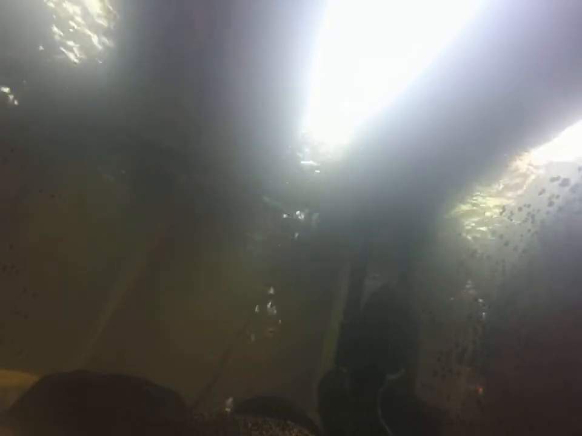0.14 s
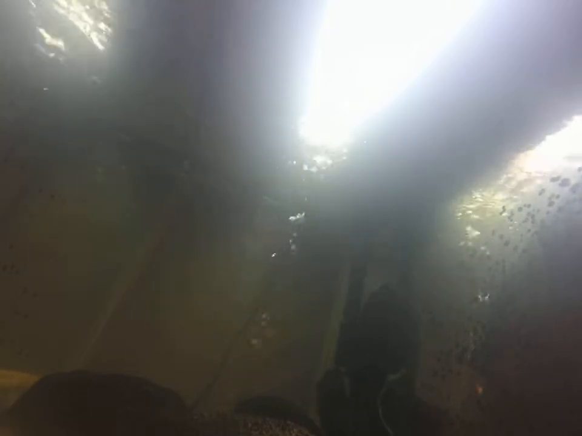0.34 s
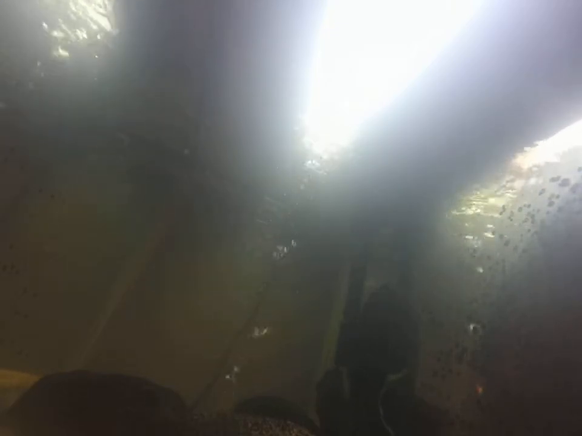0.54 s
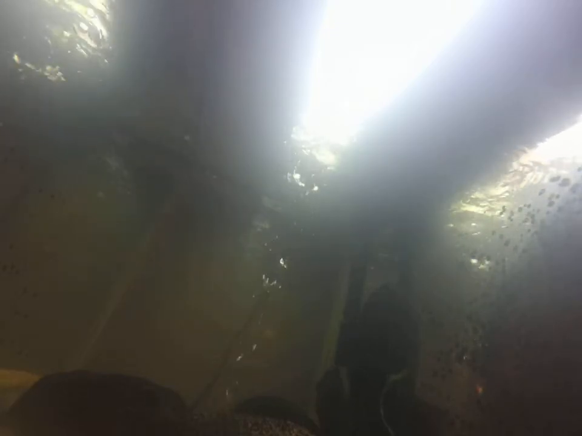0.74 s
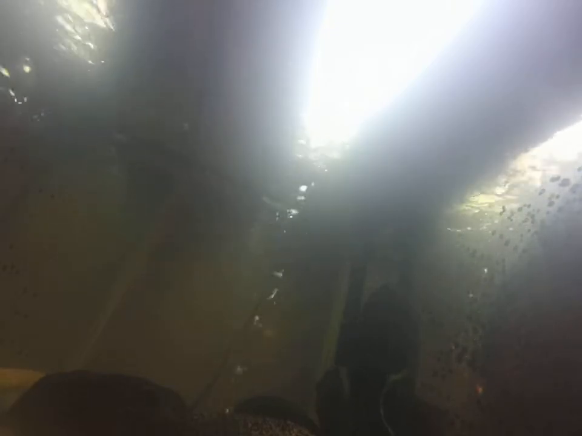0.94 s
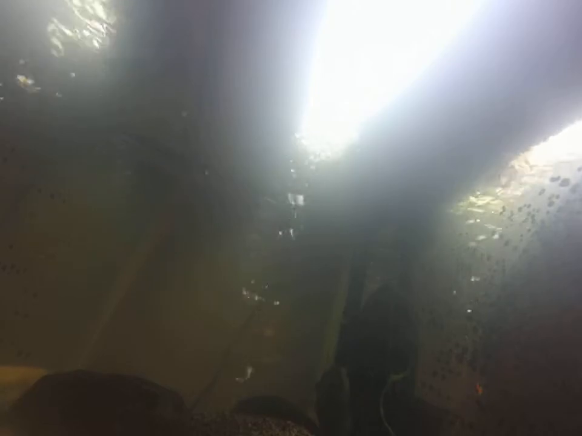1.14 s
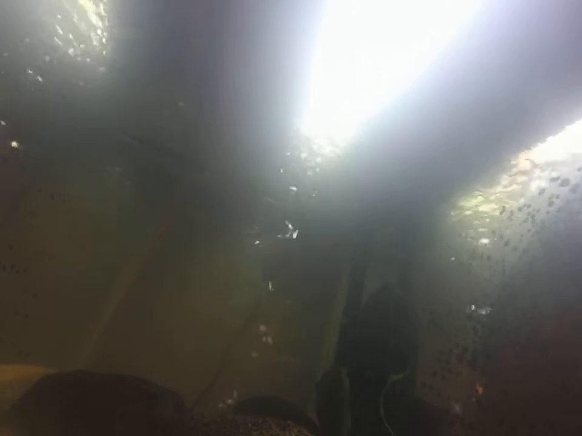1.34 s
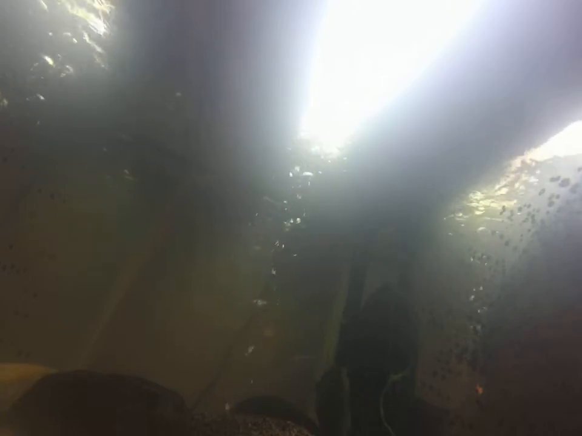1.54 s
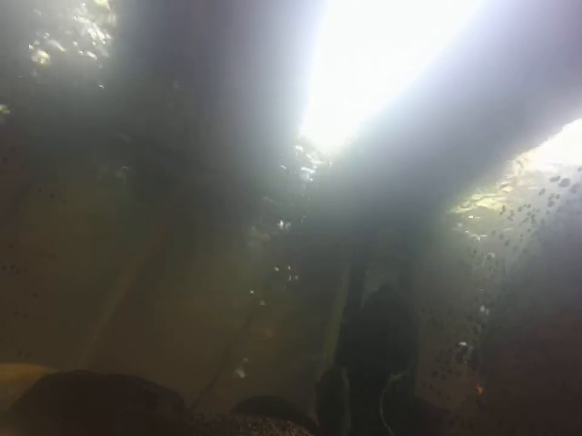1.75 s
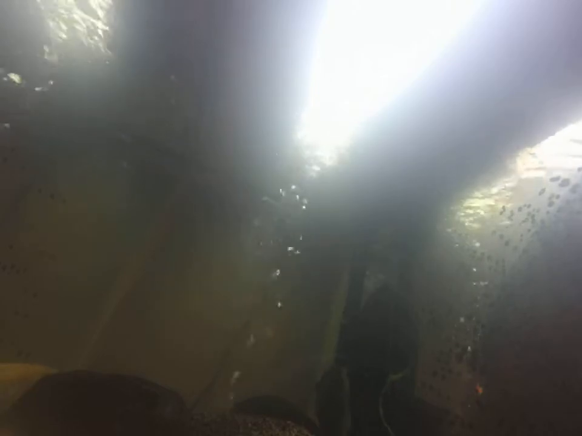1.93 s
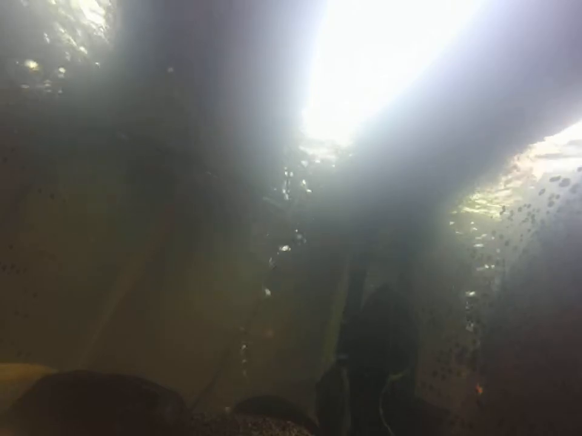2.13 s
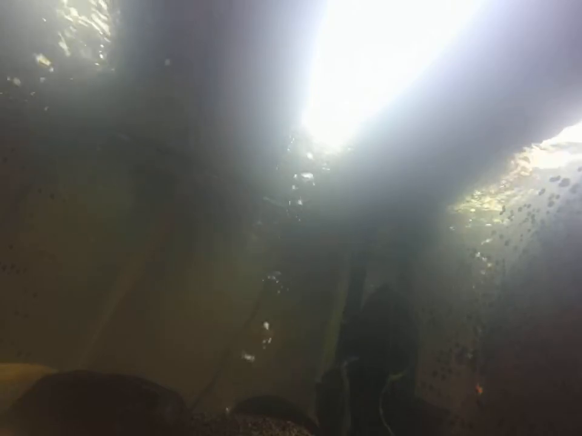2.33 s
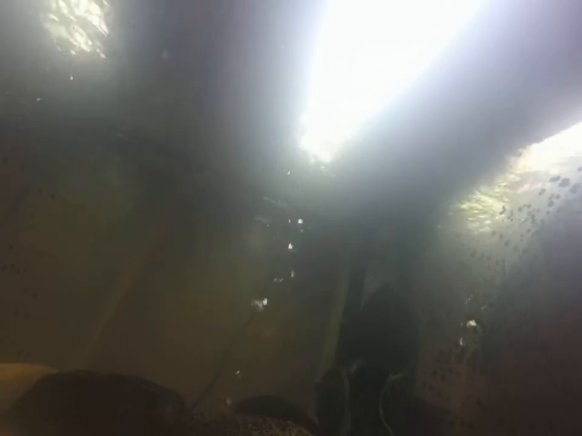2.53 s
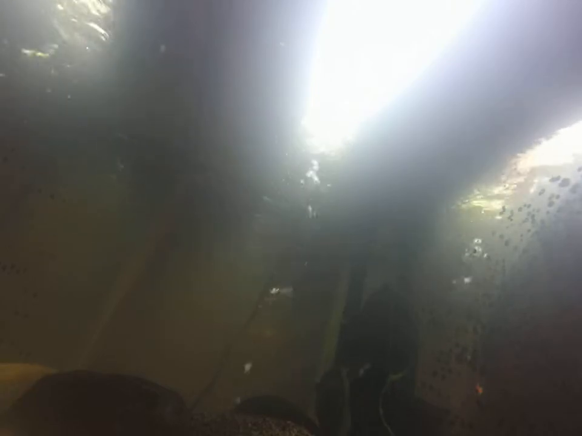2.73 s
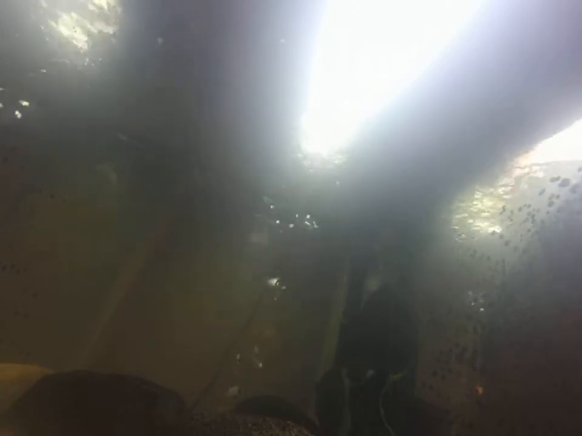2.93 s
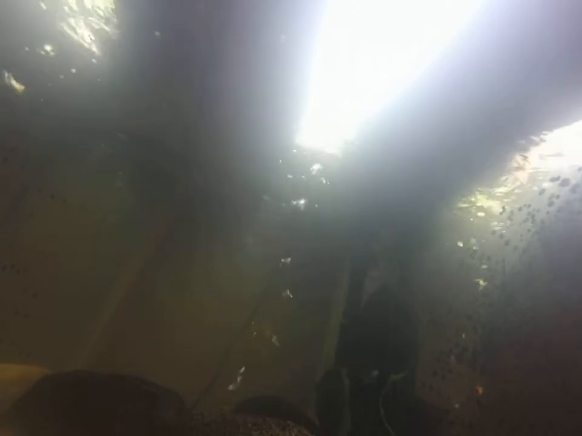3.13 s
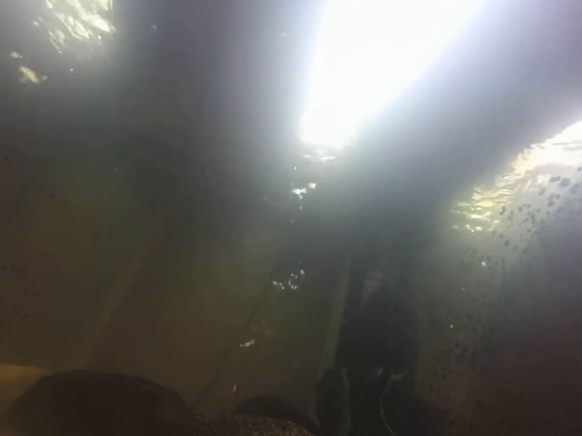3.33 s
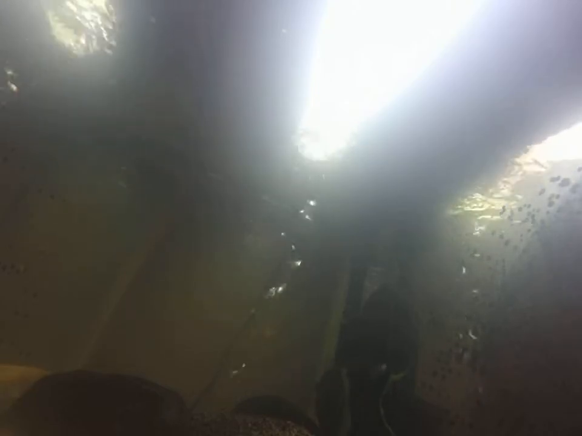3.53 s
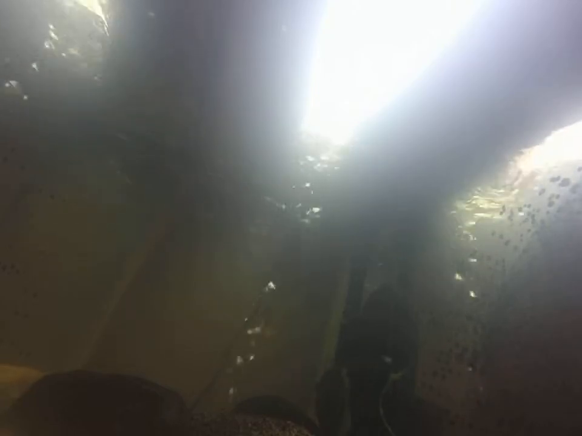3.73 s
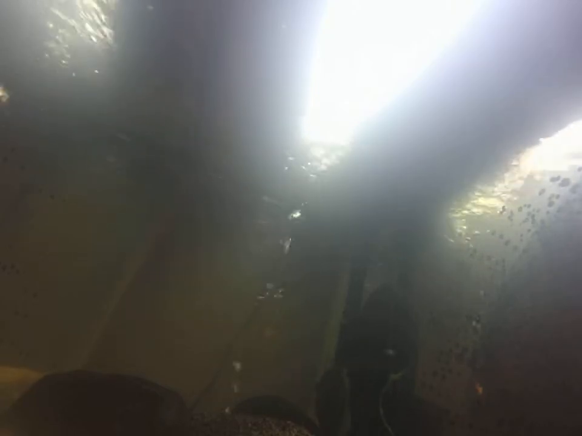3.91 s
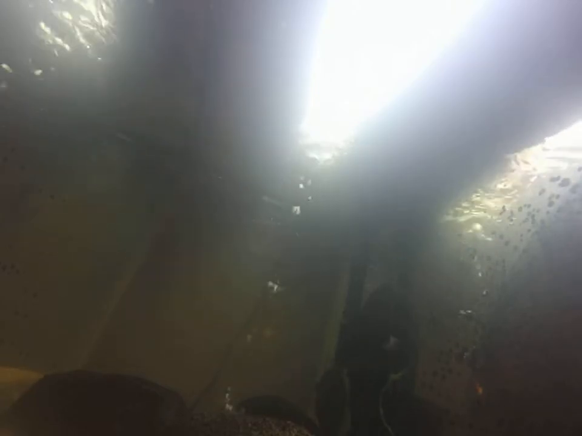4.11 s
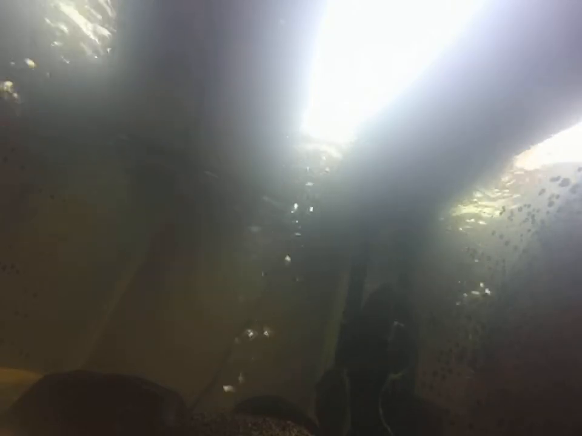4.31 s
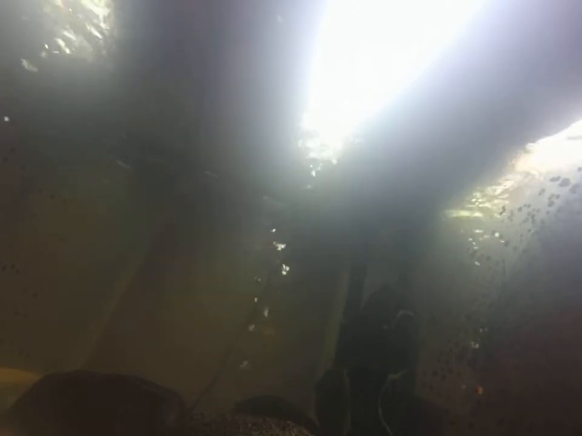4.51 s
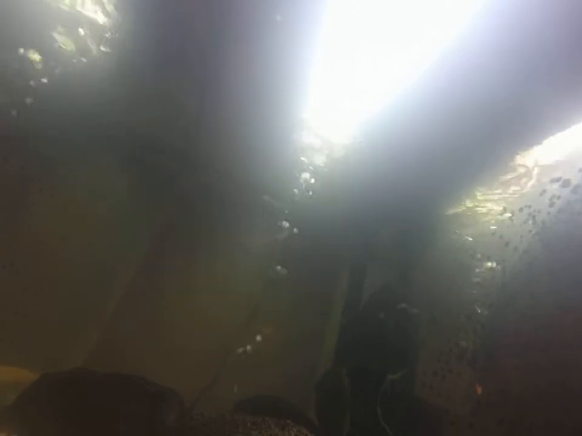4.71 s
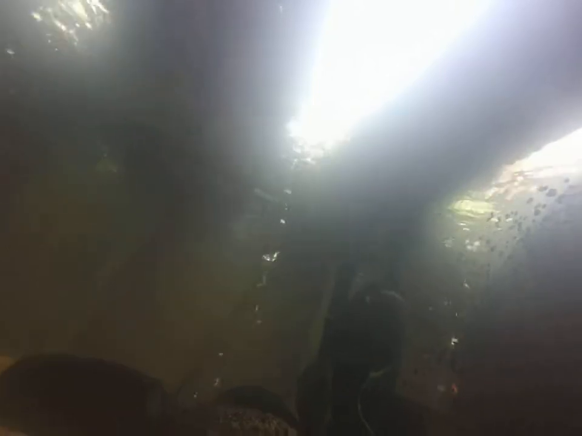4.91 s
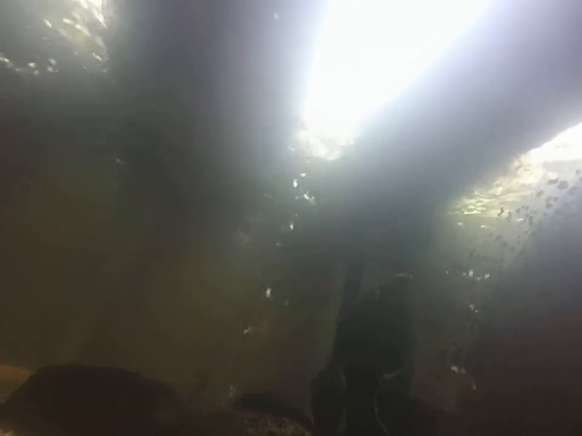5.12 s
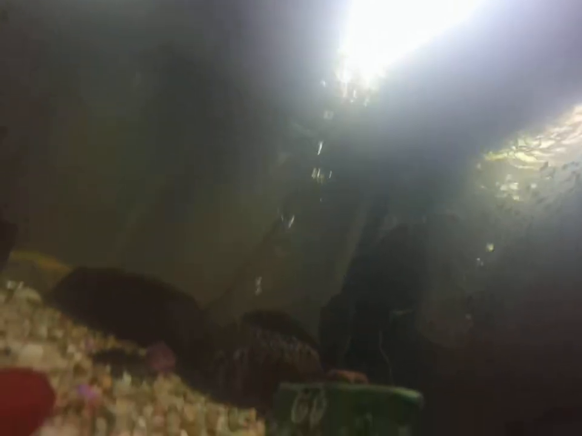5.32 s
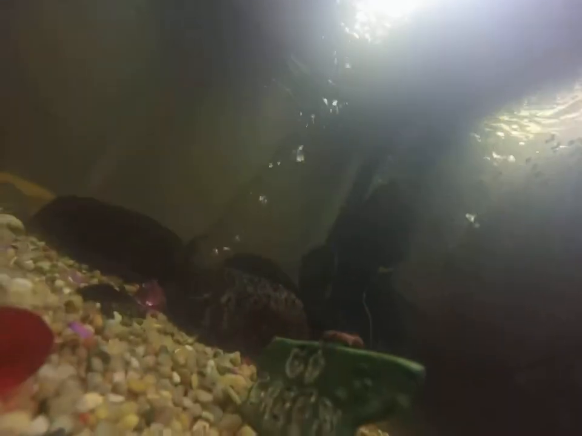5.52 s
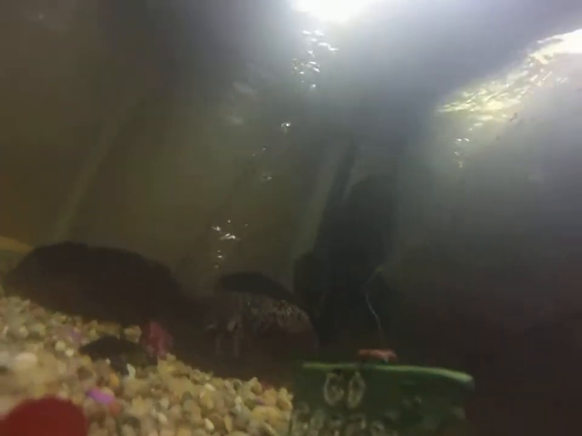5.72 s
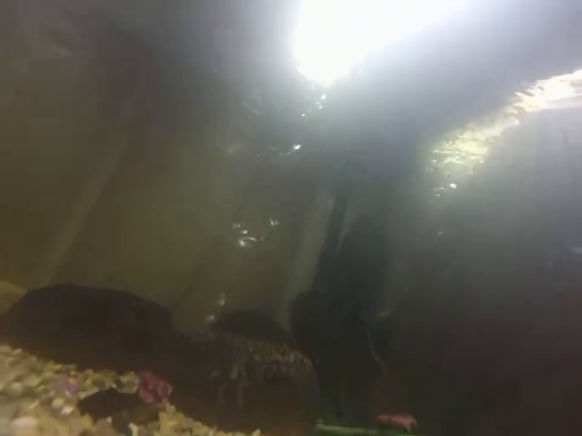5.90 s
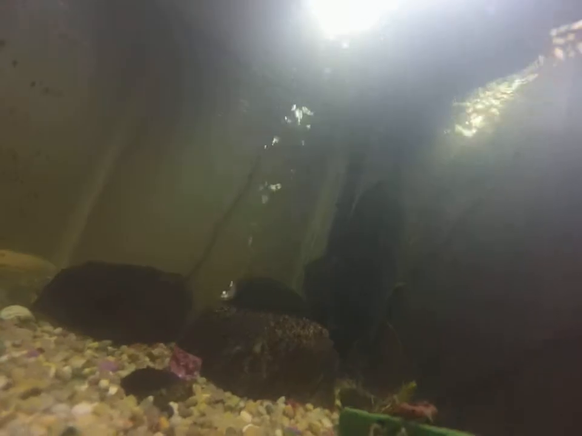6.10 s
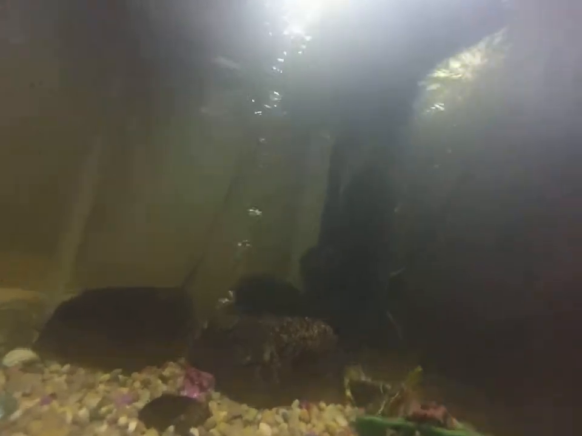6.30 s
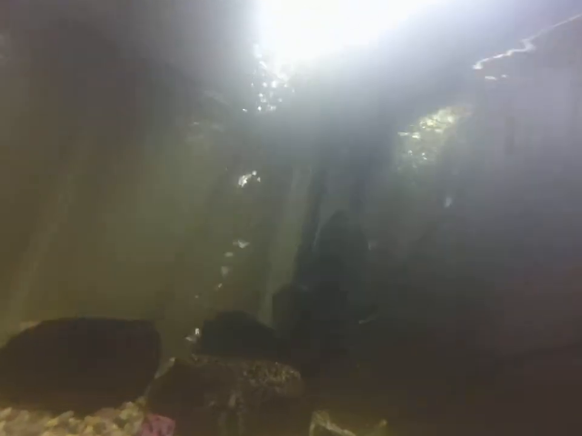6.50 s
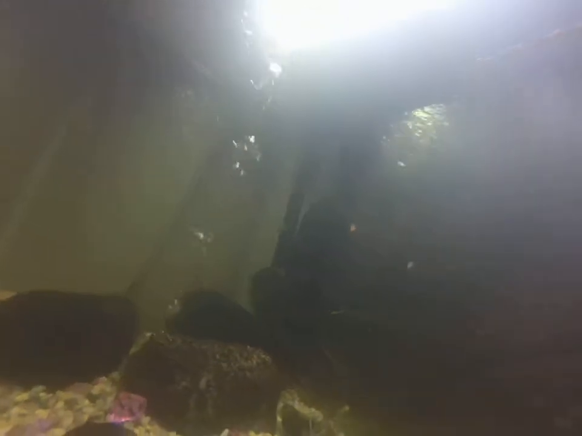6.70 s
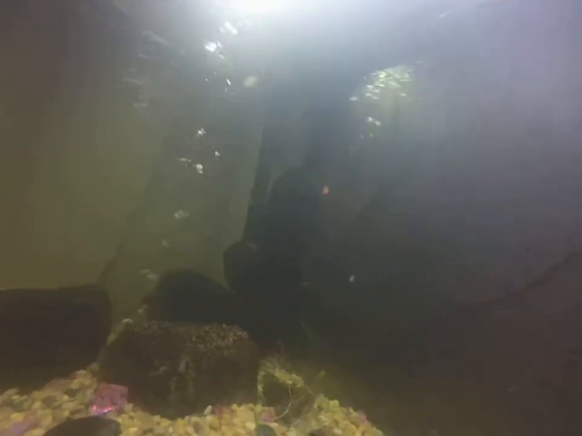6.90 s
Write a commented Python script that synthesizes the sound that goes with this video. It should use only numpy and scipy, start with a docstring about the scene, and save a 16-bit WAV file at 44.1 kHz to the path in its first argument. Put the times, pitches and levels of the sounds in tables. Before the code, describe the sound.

A close, enclosed underwater microphone picks up a droning air pump, murmuring water and crisp, glassy bubble plinks over faint hiss. Midway come dull nudges, then gritty scrapes, plastic knocks and a run of deep bouncing thumps as the housing shifts on the gravel. One more loud, clipped clatter leaves the water briefly muted before a looser, more gurgling bubble sound recovers with less deep hum.

```python
"""An air pump hums through the glass of a fish tank as a sum of mains harmonics, and the water churns as flickering
noise bands. Bubbles ping as damped sines and excite the standing waves of the water. A camera housing on the gravel
is nudged, dragged, and dropped: filtered noise scrapes, damped sines knock, single pressure swings thump and bounce.
The background level dips under the loud handling and recovers; behind it lies a fine, even background hiss, partly
the microphone's own noise, made of noise shaped by resonances."""
import sys
import numpy as np
from scipy import signal
from scipy.fft import rfft, irfft
from scipy.io import wavfile
from scipy.ndimage import uniform_filter1d

SR = 44100
rng = np.random.default_rng(int(sys.argv[2]) if len(sys.argv) > 2 else 0)


def ratio(d):
    """dB to gain"""
    e = np.asarray(d, float) / 20
    return 10 ** e


def digitize_waveform(pressure):
    """Quantize a signal to 16-bit integers and store it at the path in sys.argv[1].

    Rows of a 2-D input are taken as channels; values are limited to [-1, 1].
    """
    field = np.atleast_2d(pressure).T
    bounded = np.clip(field, -1, 1)
    quanta = np.round(bounded * 32767).astype(np.int16)
    wavfile.write(sys.argv[1], SR, quanta)


N = 306495
T = np.arange(N) / SR
SIZE = 4096  # samples of one short sound

# Harmonics 1-5 of the pump: level/dB (rms; the first is further set by the seating of the housing)
PUMP_HARMONICS = [-34.5, -37, -35.6, -52, -52]
MAINS_HZ = 59.96
SLOW_HZ, SLOW_DB = 12, -43.5  # slow throb under the hum: frequency, mean level in dB rms
# change of the lowest hum tone when seated, its further change when fully loose
SEATED_BASS_DB, LOOSE_BASS_DB = -0.94, -10
# Spectrum of the churning water: f/Hz, relative level/dB (per Hz)
CHURN_SPECTRUM = [(15, -11), (50, -7), (100, -2.5), (165, 0.5), (230, -6), (330, -14.5), (480, -22),
                  (550, -30), (680, -30), (730, -33.5), (1000, -42)]
CHURN_DB = -38.5  # rms before the level curve
LOOSE_BURBLE_DB = 16.5  # lift of the upper churn bands, relative to the rest, when fully loose
# Air modes inside the housing: f/Hz, width/Hz, level/dB
HOUSING_MODES = [(378.3, 20, 7.5), (646, 42, 7)]
# Standing waves of the water, before scaling in use: f/Hz, width/Hz, level/dB
TANK_MODES = [(2540, 53, -28), (3100, 75, -1.5), (3635, 71, -2), (4370, 110, 0), (5370, 120, -6),
              (5640, 71, -1), (6000, 46, -21.5), (6196, 120, -3.5), (6640, 29, -11), (7110, 75, -5),
              (7540, 63, -27.5), (7830, 60, -5), (8300, 75, -16.5), (8790, 150, -7.5), (10200, 61, -7),
              (11800, 48, -35.5), (11900, 170, -17), (12600, 480, -29)]
# Clear bubbles from the air outlet: t/s, peak level/dB, f/Hz, relative strength of the treble snap/dB
CLEAR_BUBBLES = [(0.0778, -42.5, 5370, 3), (0.1944, -32.5, 3180, -21), (0.2072, -30, 4800, -17),
                 (0.2973, -20.5, 6430, -15), (0.336, -34.5, 9200, -5), (0.3778, -30, 2550, -14),
                 (0.384, -38, 4480, -6), (0.4662, -31.5, 5040, -18), (0.6078, -36, 4350, 1),
                 (0.7467, -35.5, 2540, -19), (0.78, -20.5, 3770, -25), (1.0077, -34.5, 11900, -21),
                 (1.076, -34, 6000, -19), (1.1094, -39.5, 3100, 5), (1.1882, -34, 4270, 5),
                 (1.3005, -38.5, 8790, -16), (1.3775, -31, 4370, -10), (1.5095, -34, 3520, -21),
                 (1.5712, -34.5, 3100, -42), (1.6287, -38, 2930, -29), (1.7292, -32.5, 3300, -43),
                 (1.9061, -38.5, 4580, -3), (1.9988, -30, 7110, 7), (2.1021, -40, 5640, 2),
                 (2.1333, -30.5, 4370, -19), (2.1794, -36.5, 6130, -15), (2.22, -32, 7830, -10),
                 (2.2697, -27, 4700, -21), (2.4563, -35.5, 4500, -19), (2.6, -32.5, 4750, -14),
                 (2.7028, -32, 7740, -26), (2.7177, -27.5, 3790, -14), (2.8704, -36.5, 8300, -33),
                 (2.9526, -28, 4180, -13.5), (3.0006, -38.5, 2840, -37), (3.1807, -34, 10100, -13),
                 (3.201, -29.5, 9300, -13), (3.2793, -37, 3100, 1), (3.3232, -36, 5640, -15),
                 (3.4126, -23.5, 4370, -17), (3.4795, -32, 3490, -20), (3.5115, -26.5, 3930, -23),
                 (3.6805, -36.5, 7180, -5), (3.8132, -30, 10100, -15.5), (3.938, -32, 4270, -10.5),
                 (3.962, -32.5, 3430, -38), (4.0578, -31.5, 4360, -24), (4.1584, -37.5, 5740, -16),
                 (4.1722, -29, 10200, -17.5), (4.2462, -34, 4700, -28), (4.4154, -32, 8790, -11),
                 (4.7595, -11, 4900, -30), (4.8196, -21.5, 4720, -18), (4.8457, -27.5, 5300, -23),
                 (5.482, -40, 3150, -22), (5.5802, -29, 3640, -4.5), (5.66, -30, 4320, 9),
                 (5.7432, -32.5, 9700, -21), (6.0452, -48, 3620, -8), (6.1663, -50, 5320, -5),
                 (6.215, -43, 3100, -1), (6.2981, -42, 5160, -15), (6.3123, -37.5, 5540, -9),
                 (6.376, -32.5, 4440, -12), (6.4418, -45, 2700, -29), (6.4987, -36.5, 4030, -10),
                 (6.592, -44.5, 4520, -20), (6.6429, -38, 2860, -7), (6.6707, -38, 4200, -22),
                 (6.758, -35.5, 4450, 0), (6.7387, -47, 3110, -25), (6.9207, -34.5, 4340, -17),
                 (6.922, -34, 2620, -27)]
# Large dull bubbles at the surface: t/s, peak level/dB, initial f/Hz
LARGE_BUBBLES = [(0.078, -41, 560), (0.1424, -41.5, 1500), (1.304, -48, 633), (1.593, -36, 650),
                 (1.628, -41, 1770), (1.768, -43, 602), (2.02, -47, 610), (3.289, -45, 1530),
                 (3.462, -39, 581), (4.544, -45, 1420), (6.588, -41, 720), (6.621, -43, 658),
                 (6.655, -43.5, 1610), (6.805, -40, 692), (6.895, -40.5, 667)]
LESSER_DB, LESSER_SPREAD_DB = -50.5, 9.5  # softer outlet bubbles, before the level curve: faintest peak, range
BLIP_DB, BLIP_SPREAD_DB = -58, 9  # middling surface bubbles, before the level curve: faintest peak, range
# Housing dragged over gravel: start t/s, duration/s, level/dB (rms before the stroke envelope)
SCRAPE_STROKES = [(4.638, 0.074, -46.5), (4.701, 0.14, -39), (4.875, 0.062, -29.5), (4.952, 0.12, -38.5),
                  (5.063, 0.19, -35.5), (5.24, 0.064, -33.5), (5.292, 0.075, -27), (5.356, 0.18, -51),
                  (5.505, 0.12, -51), (5.811, 0.034, -27.5), (5.843, 0.063, -43), (5.913, 0.073, -45)]
SCRAPE_TOP_HZ, BRIGHTER_DB_PER_OCTAVE = 3300, 14  # top of a -40 dB scrape; pressing harder raises it
# Resonances of the scraped shell: f/Hz, width/Hz, level/dB
SHELL_MODES = [(630, 92, 3.5), (1370, 180, 0.5), (2000, 370, -1.5), (2850, 390, 6), (4700, 1600, 4)]
# Stones against the housing: t/s, peak level/dB, f/Hz, relative strength of the snap/dB
STONE_KNOCKS = [(3.683, -28.5, 583, -29), (4.174, -38, 620, -32), (4.595, -34.5, 1190, -28),
                (4.632, -35, 1380, -36), (4.713, -23, 1320, -30), (4.731, -15, 1320, -27),
                (4.807, -21.5, 2690, -19), (4.879, -22, 630, -23), (4.963, -17.5, 1340, -26),
                (5.043, -28, 694, -13), (5.239, -23, 624, -15), (5.256, -21.5, 630, -29),
                (5.278, -23, 2800, -34), (5.303, -16, 610, -34), (5.328, -13, 2920, -31),
                (5.343, -13.5, 3020, -33), (5.488, -28, 1500, -25), (5.796, -16.5, 3050, -18),
                (5.811, -6, 1380, -13), (5.82, -0.5, 2750, -16), (5.843, -11.5, 1660, -21.5),
                (5.856, -3, 1940, -21.5), (5.862, -2, 1630, -52), (5.878, -10, 2680, -21.5),
                (5.902, -23.5, 1340, -20), (5.911, -18, 2920, -28.5), (5.93, -11.5, 1470, -40.5),
                (5.951, -18.5, 1150, -45), (5.967, -33.5, 1200, -27), (6.064, -36.5, 625, -22),
                (6.075, -26, 1280, -43), (6.087, -45, 2200, -36), (6.104, -46, 1500, -20)]
# Bumps that squeeze the air at the microphone: t/s, peak level/dB, f/Hz, direction of swing (+1 or -1)
SINGLE_THUMPS = [(3.699, -19, 90, 1), (3.715, -28, 70.4, 1), (4.143, -17, 117, 1), (4.198, -22, 60.5, 1),
                 (4.731, -19, 250, 1), (4.962, -17.5, 200, 1), (5.019, -9.5, 65, 1), (5.075, -11, 130, 1),
                 (5.107, -9, 166, -1), (5.126, -10.5, 150, -1), (5.179, -6, 150, -1)]
# the dragged housing judders
JUDDER_START_S, JUDDER_GAP_S, JUDDER_DB, JUDDER_HZ = 5.043, 0.024, -13, 169
# dropped, it bounces: each bounce comes after a longer gap, weaker and lower than the last
BOUNCE_S, BOUNCE_GAP_S, GAP_GROWTH_S = 5.370, 0.0245, 0.0039
BOUNCE_DB, BOUNCE_LOSS_DB, BOUNCE_HZ, BOUNCE_SAG_HZ = -0.05, 3.1, 196.5, 9
# the shell touches a stone at each bounce
TAP_DB, TAP_LOSS_DB, TAP_HZ, TAP_LEAD_S = -20, 1.9, 713, 0.0022
TAP_SNAP_DB, TAP_DULLING_DB = -18, 3.5
# Nudges that set the water rumbling: t/s, level/dB (rms at the height of the swell)
RUMBLE_NUDGES = [(3.699, -24), (4.17, -25)]
STIR_DB_PER_S, SETTLE_DB_PER_S = 700, 152
# Rumble while the housing is dragged: t/s, level/dB (rms)
DRAG_RUMBLE = [(4.4, -50), (4.6, -38), (5.19, -23), (5.22, -30), (5.33, -34.5), (5.5, -50.5)]
# Spectrum of the background hiss before its resonances: f/Hz, relative level/dB (per Hz)
HISS_SPECTRUM = [(410, -30), (700, 1.5), (2190, -5.5), (3070, -5.5), (3920, -15.5), (4350, -11.5),
                 (8990, -20.5), (12300, -17), (15500, -18)]
HISS_DB = -63.5  # mean level before the level curve
# The background level dips under the loud handling and recovers: t/s, level/dB
BACKGROUND_LEVEL = [(0, 0), (4.6, 0), (5, 1.5), (5.46, -5.5), (5.79, -3), (5.87, -26), (5.97, -15.5),
                    (6.1, -14), (6.501, -5.5), (6.95, -3)]
# How loosely the housing sits on the gravel: t/s, share (0-1)
LOOSENESS = [(4.6, 0), (5.36, 0.88), (5.46, 0.35), (5.87, 0.4), (6.1, 0.6), (6.3, 0.2), (6.95, 0.7)]


def unit(x):
    """Normalisation to rms 1."""
    return x / np.sqrt(np.mean(x ** 2))


def walk(rate):
    """Slow random modulation: random levels, rate a second, smoothed and scaled to rms 1."""
    k = int(SR / rate)
    levels = rng.standard_normal(SIZE)[np.arange(N) // k]
    return unit(uniform_filter1d(uniform_filter1d(levels, k), k))


def band(x, lo_hz, hi_hz):
    """Butterworth band-pass filtering."""
    sos = signal.butter(2, [lo_hz, min(hi_hz, SR / 2.2)], "band", fs=SR, output="sos")
    return signal.sosfilt(sos, x)


def mix(times, peak_db, sounds):
    """Superposition: each sound is laid at its time with its peak level."""
    out = np.zeros(N + sounds.shape[1])
    for s, db, sound in zip(times, peak_db, sounds):
        start = int(s * SR)
        out[start:start + len(sound)] += ratio(db) * sound / np.abs(sound).max()
    return out[:N]


def coloured(points):
    """Random spectrum shaped by (f/Hz, level/dB) points, and its frequencies."""
    hz, db = np.transpose(points)
    f = np.fft.rfftfreq(N, 1 / SR) + 1  # the offset avoids log(0)
    gain_db = np.interp(np.log(f), np.log(hz), db, left=-90, right=-90)
    return rfft(rng.standard_normal(N)) * ratio(gain_db), f


def peaks(f, modes):
    """Resonance: gain of a direct path plus a peak at each (f/Hz, width/Hz, level/dB) mode."""
    return 1 + sum(ratio(db) / np.sqrt(1 + (2 * (f - hz) / width) ** 2) for hz, width, db in modes)


def ping(hz, cycles, rise=0., swell=0.71):
    """Damped oscillation, one a row: it swells, decays about 9 dB in so many cycles and may rise in pitch."""
    turns = np.outer(hz, np.arange(SIZE) / SR)
    wave = np.sin(2 * np.pi * turns * (1 + rise * np.minimum(turns / cycles, 2)))
    return wave * np.exp(-turns / cycles) * (1 - np.exp(-(turns / swell) ** 2))


def crack(count, decay_s, lo_hz, hi_hz):
    """Transients: short decaying bursts of band-limited noise, one a row."""
    t = np.arange(SIZE) / SR
    envelope = np.exp(-t / decay_s) * np.minimum(t / 0.00075, 1)
    return band(rng.standard_normal((count, SIZE)) * envelope, lo_hz, hi_hz)


def pump(lowest_db):
    """Harmonic series of a mains-driven diaphragm: even tones a quarter turn behind make the wave lopsided."""
    turn = 2 * np.pi * MAINS_HZ * T
    tones = []
    for k, db in enumerate(PUMP_HARMONICS):
        level = ratio(db + 0.81 * walk(1.5))
        tones.append(level * np.cos((k + 1) * turn - np.pi / 2 * (k % 2)))
    throb = ratio(SLOW_DB + 2.8 * walk(2)) * np.sin(2 * np.pi * SLOW_HZ * T + 2.0 * walk(1.5))
    return np.sqrt(2) * (ratio(lowest_db) * tones[0] + sum(tones[1:]) + throb)  # rms to peak


def churn(burble_db):
    """Turbulence: noise in half-octave bands, each flickering, the upper ones gurgling together."""
    colour, f = coloured(CHURN_SPECTRUM)
    colour = colour * peaks(f, HOUSING_MODES)
    gurgle, out = walk(17), 0
    for centre in np.arange(7, 21) / 2:  # log2 of the band centre in Hz
        share = np.clip(1 - 2 * np.abs(np.log2(f) - centre), 0, 1)
        upper = np.clip(centre - 7.6, 0, 1)
        flicker_db = 1.6 * walk(25) + upper * (2.2 * gurgle + burble_db)
        out = out + irfft(colour * share, N) * ratio(flicker_db)
    return ratio(CHURN_DB) * unit(out)


def in_tank(hz, snap_db):
    """Bubble excitation of standing waves: ping and snap, direct, through the modes and off glass and gravel."""
    mode_hz, width, db = np.transpose(TANK_MODES)
    mode_cycles = mode_hz / (np.pi * .55 * width)
    modes = ping(mode_hz, mode_cycles[:, None]) * (ratio(.45 * db) * width / SR)[:, None]
    # where the bubble is decides how it couples to each wave
    coupling = ratio(3.0 * rng.standard_normal((len(hz), len(TANK_MODES))))
    coupling = coupling * (-1) ** np.arange(len(TANK_MODES))
    scatter = crack(len(hz), 0.0094, 2000, 13000)
    snap = ratio(snap_db + 4)[:, None] * crack(len(hz), 0.0018, 4000, 12000)
    source = ping(hz, 4.2, swell=0.8) + snap
    path = ratio(25) * coupling @ rfft(modes, 2 * SIZE) + ratio(-27) * rfft(scatter, 2 * SIZE)
    return irfft(rfft(source, 2 * SIZE) * (1 + path))[:, :SIZE]


def bubbles():
    """Volume pulsation of the clear bubbles from the air outlet, ringing the tank."""
    s, db, hz, snap_db = np.transpose(CLEAR_BUBBLES)
    return mix(s, db, in_tank(hz, snap_db))


def gulps():
    """Volume pulsation of large bubbles at the surface: dull pings of slightly rising pitch."""
    s, db, hz = np.transpose(LARGE_BUBBLES)
    return mix(s, db, ping(hz, 9.9, 0.0062, swell=0.72))


def outlet(count=70):
    """Random bubble release: softer bubbles leave the air outlet and excite the tank modes."""
    when, size, loud, snap = rng.random((count, 4)).T
    sounds = in_tank(2800 * 3.1 ** size ** 1.5, -32 + 30 * snap)
    return mix(when * N / SR, LESSER_DB + LESSER_SPREAD_DB * loud, sounds)


def fizz(count=700):
    """Pitch by bubble size: many faint bubbles, the small ones ringing the tank, the large ones burbling."""
    when, size, loud, snap = rng.random((count, 4)).T
    small = mix(when * N / SR, -54 + 11 * loud ** 2, in_tank(2600 * 4.83 ** size, -30 + 22 * snap))
    when, size, loud = rng.random((count, 3)).T
    large_db = -51 - 9 * size - 3.84 * np.log(1 - loud + 0.016)
    return small + mix(when * N / SR, large_db, ping(250 * 2.4 ** size, 8.1, 0.016))


def blips(count=30):
    """Damped pulsation of scattered middling bubbles with a short, watery pitch."""
    when, size, loud = rng.random((count, 3)).T
    sounds = ping(1300 * 2.3 ** size, 8.0, 0.006, swell=1.05)
    return mix(when * N / SR, BLIP_DB + BLIP_SPREAD_DB * loud, sounds)


def bounces(count=4):
    """Successive impacts: number and time of each bounce, with gaps that grow."""
    k = np.arange(count)
    return k, BOUNCE_S + k * BOUNCE_GAP_S + k * (k - 1) / 2 * GAP_GROWTH_S


def thumps(count=7):
    """Impact series of single bumps, judder and bounces: rows t/s, peak level/dB, f/Hz, direction."""
    late, loud, size, way = rng.standard_normal((count, 4)).T
    judder_s = JUDDER_START_S + JUDDER_GAP_S * (np.arange(count) + 0.154 * late)
    judder = [judder_s, JUDDER_DB + 2.3 * loud, JUDDER_HZ * 1.7 ** size, np.sign(way)]
    k, s = bounces()
    bounce = [s, BOUNCE_DB - BOUNCE_LOSS_DB * k, BOUNCE_HZ - BOUNCE_SAG_HZ * k, np.ones(len(k))]
    return np.hstack([np.transpose(SINGLE_THUMPS), judder, bounce])


def bumps():
    """Compression of the air at the microphone: each bump is one swing of pressure that eases back."""
    s, db, hz, way = thumps()
    lead = .02  # seconds from the start of the sound to the middle of the swing
    turns = np.outer(hz, np.arange(SIZE) / SR - lead)
    ease = np.exp(-(np.maximum(turns - .25, 0) / 0.31) ** 0.9)
    swing = np.sin(2 * np.pi * np.clip(turns, -.5, .25)) * ease
    soft = band(way[:, None] * swing, 6.4, 1400)  # the air cushion rounds the corners
    return mix(s - lead, db, soft)


def knocks():
    """Impact series of single stones and taps at each bounce: rows t/s, peak level/dB, f/Hz, snap/dB."""
    k, s = bounces()
    tap_db, snap_db = TAP_DB - TAP_LOSS_DB * k, TAP_SNAP_DB - TAP_DULLING_DB * k
    taps = [s - TAP_LEAD_S, tap_db, np.full(len(k), TAP_HZ), snap_db]
    return np.hstack([np.transpose(STONE_KNOCKS), taps])


def stones():
    """Impact on damped plastic: a blunt, heavily damped blow with a rattle and a bright snap."""
    s, db, hz, snap_db = knocks()
    blow = ping(hz, 1.1, swell=1.2)
    rattle = ratio(snap_db / 2 - 4.5)[:, None] * crack(len(hz), 0.006, 930, 3500)
    snap = ratio(snap_db + 3.5)[:, None] * crack(len(hz), 0.0012, 2500, 11000)
    return mix(s, db, blow + rattle + snap)


def scrapes():
    """Friction: dense, uneven grit noise under the sliding housing excites the shell resonances."""
    grit = rng.standard_normal(N) * ratio(5.0 * walk(500) + 2.5 * walk(90))
    dull = signal.lfilter([1], [1, -.85], grit)  # soft plastic passes more of the low grit
    dull = irfft(rfft(dull) * peaks(np.fft.rfftfreq(N, 1 / SR), SHELL_MODES), N)
    out = 0
    for s, length, db in SCRAPE_STROKES:
        top_hz = SCRAPE_TOP_HZ * 2 ** ((db + 40) / BRIGHTER_DB_PER_OCTAVE)
        corners = [s, s + 0.00293, s + 0.55 * length, s + length]
        stroke = np.interp(T, corners, [0.0028, 0.92, 1.0, 0.0033])
        out = out + ratio(db) * stroke * unit(band(dull, 450, top_hz))
    return out


def slosh():
    """Build-up and decay of the rumble: quick swells at the nudges, a long one under the drag."""
    gain = ratio(np.interp(T, *np.transpose(DRAG_RUMBLE)))
    for s, db in RUMBLE_NUDGES:
        gain = gain + ratio(db - np.maximum(STIR_DB_PER_S * (s - T), SETTLE_DB_PER_S * (T - s)))
    return gain


def rumble():
    """Low-frequency turbulence of the stirred water: flickering low noise under the slosh envelope."""
    low = band(band(rng.standard_normal(N), 21, 140), 5, 440)
    return unit(low * ratio(0.92 * walk(30))) * slosh()


def hiss():
    """Broadband noise: a fine, even background hiss, partly the microphone's own noise, peaked at the tank modes."""
    colour, f = coloured(HISS_SPECTRUM)
    ringing = peaks(f, [(hz, width, .6 * db + 8) for hz, width, db in TANK_MODES])
    return ratio(HISS_DB + 0.56 * walk(22)) * unit(irfft(colour * ringing, N))


def scene():
    """Superposition of the background sounds under their level curve, the bubbles and the handling."""
    level_db = np.interp(T, *np.transpose(BACKGROUND_LEVEL))
    loose = np.clip(np.interp(T, *np.transpose(LOOSENESS)), 0, 1)
    hum = pump(SEATED_BASS_DB + LOOSE_BASS_DB * loose)
    water = churn(LOOSE_BURBLE_DB * loose) + fizz() + blips()
    background = (hum + water) * ratio(level_db)
    # hiss and soft bubbles follow the level curve less far
    background = background + hiss() * ratio(0.78 * level_db) + outlet() * ratio(0.7 * level_db)
    handling = scrapes() + stones() + bumps() + rumble()
    return (background + bubbles() + gulps() + handling)[None]


def band_limit(x):
    """A steep low-pass at the top of the band."""
    return signal.sosfilt(signal.butter(12, 16810, fs=SR, output="sos"), x)


def record(dry):
    """Low-pass and saturation: the sealed microphone loses the top; the converter clips at full scale."""
    sealed = signal.sosfilt(signal.butter(2, 12500, fs=SR, output="sos"), dry)
    finished = np.clip(sealed, -1, 1)
    return band_limit(finished)


dry = scene()
out = record(dry)
digitize_waveform(out)
```